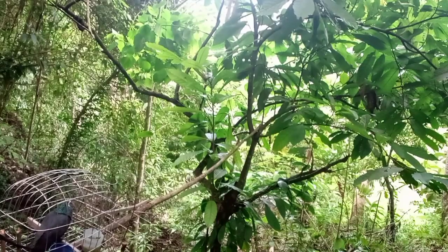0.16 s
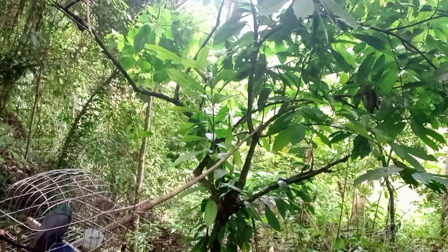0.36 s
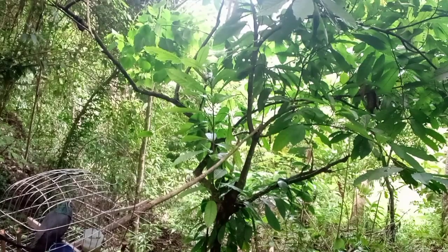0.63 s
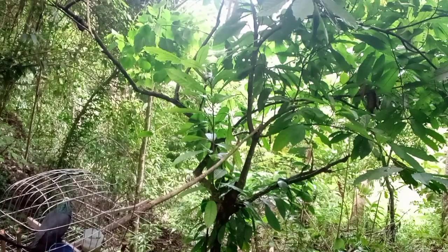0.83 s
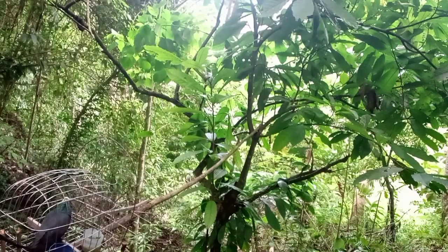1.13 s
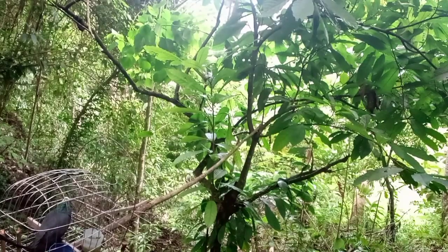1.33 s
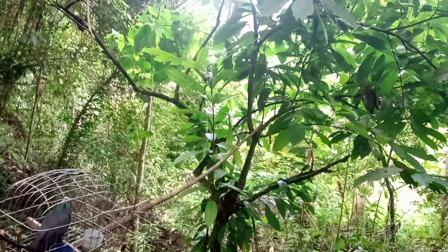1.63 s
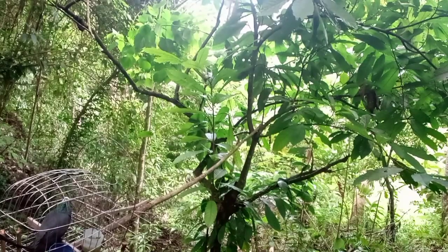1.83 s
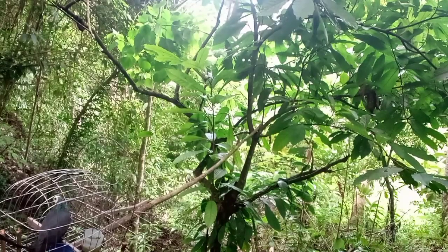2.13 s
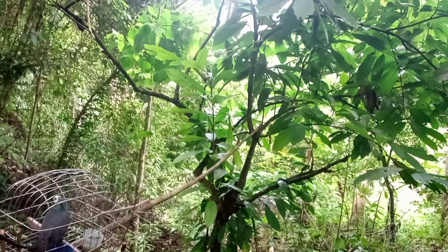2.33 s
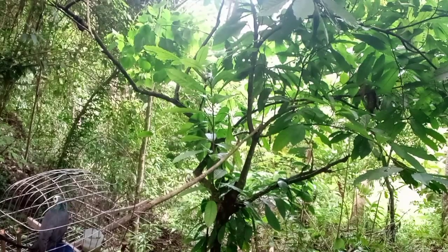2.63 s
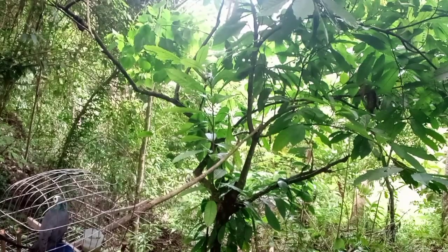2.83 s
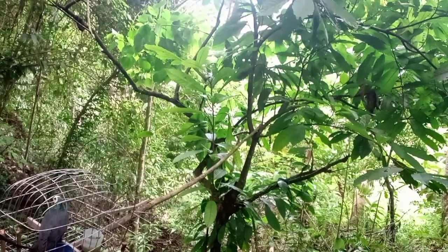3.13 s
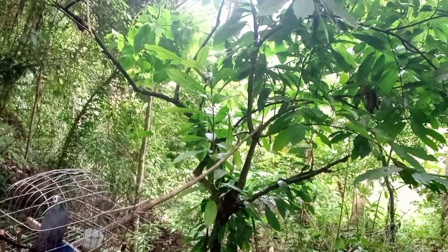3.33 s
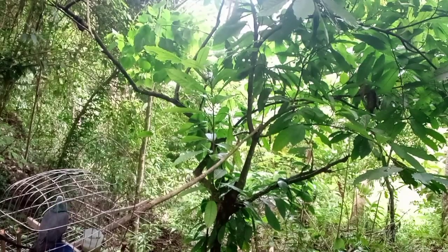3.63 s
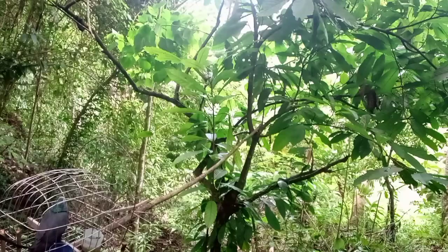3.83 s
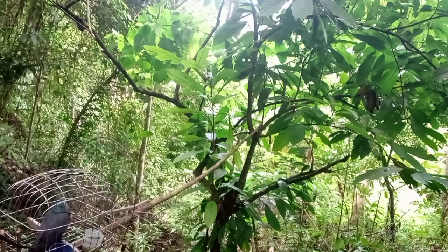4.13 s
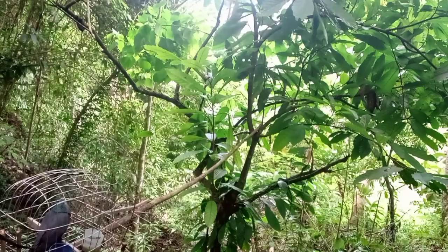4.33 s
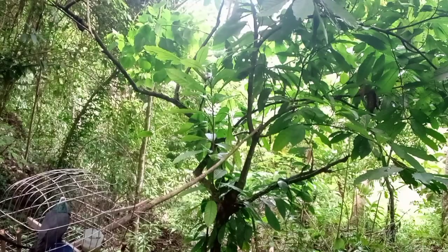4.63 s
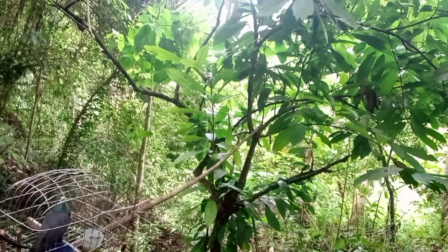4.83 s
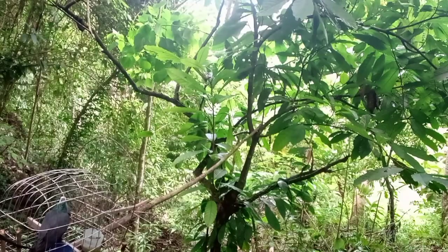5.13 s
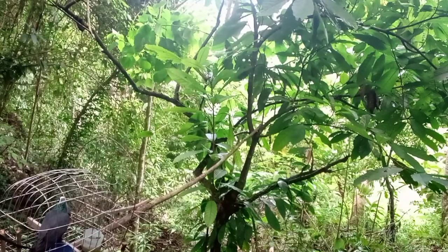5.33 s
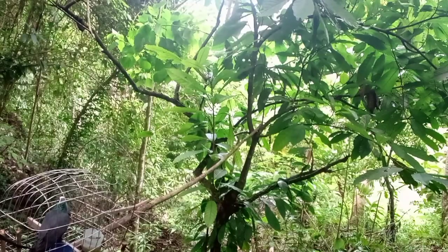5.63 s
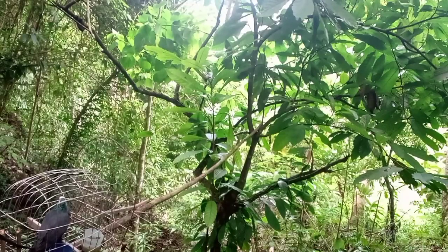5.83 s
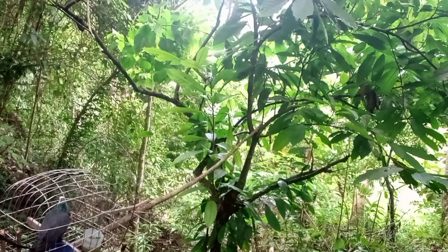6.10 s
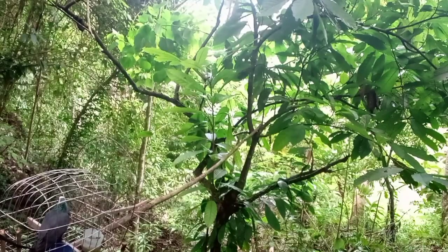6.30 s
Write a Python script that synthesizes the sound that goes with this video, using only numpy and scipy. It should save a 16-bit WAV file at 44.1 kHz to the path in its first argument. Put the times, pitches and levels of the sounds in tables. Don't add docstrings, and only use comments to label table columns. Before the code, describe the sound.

In a forest, a pigeon out of sight finishes a brief low coo right at the start. A near cricket then chirps rapidly in clear high pulses, with short gaps between bouts, over blurred cicadas and a very high rasping katydid. Twigs tick and one sharper click comes midway. Later the pigeon gives three closely spaced hollow coos, ringing softly among trunks. Faint farther hoots close it. One microphone, mono, with soft air rumble and slight hiss.

```python
import sys
import numpy as np
from scipy import signal
from scipy.fft import rfft, irfft
from scipy.io import wavfile
from scipy.ndimage import uniform_filter1d

SR = 44100
rng = np.random.default_rng(int(sys.argv[2]) if len(sys.argv) > 2 else 0)


def linear_from_db(decibels):
    return 10 ** (np.asarray(decibels, float) / 20)


def int16_out(signal):
    q = np.round(np.clip(np.atleast_2d(signal).T, -1, 1) * 32767)
    wavfile.write(sys.argv[1], SR, q.astype(np.int16))


N = 284886
TIME = np.arange(N) / SR
COARSE_STEP = 16
COARSE_N = -(-N // COARSE_STEP) + 2

# (time [s], voice pitch [Hz], voice level [dB], air-sac level [dB])
COOS = [
    [(0, 489, -52, -55), (.03, 481, -42, -65), (.055, 477, -38, -61), (.08, 491, -43, -63),
     (.098, 428, -44, -73)],
    [(3.783, 497, -44.5, -56.5), (3.798, 489.5, -40.5, -51.5), (3.82, 510, -50.5, -54),
     (3.834, 460, -41, -60)],
    [(4.024, 440, -47.5, -56), (4.042, 455.5, -35.5, -47), (4.078, 483, -46.5, -39.5),
     (4.1, 484, -41, -52.5), (4.15, 503, -43, -46), (4.178, 498.6, -35.5, -45.5), (4.205, 470, -46, -51.5),
     (4.225, 462, -41.5, -64), (4.25, 427, -40, -56.5)],
    [(4.281, 421, -46.5, -49), (4.315, 453.5, -35.5, -54), (4.358, 483, -41, -61), (4.385, 483, -40, -59),
     (4.415, 488, -43.5, -54), (4.452, 486, -51, -64.5), (4.49, 477, -39.5, -56.5), (4.525, 486, -42, -53),
     (4.549, 423, -45.5, -66.5)],
]


def columns(rows, t=TIME):
    s, *rest = np.transpose(rows)
    return [np.interp(t, s, column) for column in rest]


def rms_one(x):
    return x / np.sqrt(np.mean(x ** 2))


def coloured(spectrum):
    hz, db = np.transpose(spectrum)
    bins = np.arange(1, N // 2 + 2) * SR / N
    gain = linear_from_db(np.interp(np.log(bins), np.log(hz), db, -90, -90))
    return rms_one(irfft(rfft(rng.standard_normal(N)) * gain, N))


def coarse(hz):
    lowpass = signal.butter(2, hz, fs=SR / COARSE_STEP, output="sos")
    noise = rng.standard_normal(N // COARSE_STEP + SR // COARSE_STEP)
    return rms_one(signal.sosfilt(lowpass, noise)[-COARSE_N:])


def fine(x):
    return np.interp(np.arange(N) / COARSE_STEP, np.arange(len(x)), x)


def slow(hz):
    return fine(coarse(hz))


def turns(hz):
    return 2 * np.pi * np.cumsum(hz) / SR


def blur(hz, width_hz):
    phase = turns(hz)
    return slow(width_hz / 2) * np.cos(phase) + slow(width_hz / 2) * np.sin(phase)


def scatter(x, level_db, t60):
    age = TIME[:SR]
    build_up = np.minimum(age / 0.041, 1)
    wash = rng.standard_normal(SR) * linear_from_db(-60 * age / t60) * build_up
    return linear_from_db(level_db) * signal.fftconvolve(x, wash / np.sqrt(np.sum(wash ** 2)))[:N]


def moving_air():
    # (frequency [Hz], level [dB per Hz])
    air_spectrum = [(20, -32), (50, -9), (90, 0.5), (200, -4.5), (350, -8.5), (700, -13), (1500, -18),
                    (3000, -21), (3600, -25), (4750, -33.5), (7800, -27), (10000, -28.5), (13000, -25.5),
                    (16000, -24)]
    return linear_from_db(-62.5) * coloured(air_spectrum)


def choruses():
    # (centre [Hz], width [Hz], level [dB], throb rate [per s], throb depth [0-1], patchiness [dB])
    bands = [(7027, 204, -66, 42, 0.21, 0.7), (6850, 310, -73, 53, 0.1, 1.2), (5840, 420, -69, 39, 0.2, 1),
             (5570, 380, -74.5, 23, .1, 1.5), (6290, 220, -72, 35, 0, 2), (8070, 350, -88.5, 10, .4, 3.5),
             (7450, 300, -85.5, 9.4, .3, 5), (4020, 310, -86, 20, 0, 1)]
    steady = np.ones(N)
    out = np.zeros(N)
    for hz, width_hz, db, per_s, depth, patchy_db in bands:
        throb = 1 + depth * np.sin(turns(per_s * steady))
        out += linear_from_db(db + patchy_db * slow(3)) * throb * blur(hz * steady, width_hz)
    return out


def cicadas():
    # (start [s], length [s], level [dB], first resonance [Hz], last resonance [Hz])
    phrases = [(.2, .98, -74, 4000, 4270), (.18, 0.93, -73, 3860, 4000), (1.147, 1.54, -73, 3993, 4186),
               (1.7, 1.3, -72.5, 3907, 3878), (2.4, 1.13, -71.5, 4090, 4190),
               (2.75, 1.17, -76.5, 3930, 3900), (3.448, 1.41, -80.5, 4154, 4120),
               (3.7, 1.22, -77, 3890, 3880), (4.744, 1.62, -72, 4100, 4236), (4.798, 1.38, -72, 3900, 3930),
               (6.2, .6, -79, 3870, 3900)]
    clicks_per_s = (96.9, 97.4)
    line_width_hz, resonance_width_hz = 24, 207
    swell_shape, cut_off_s = 0.51, 0.051
    centre_hz = 4050
    t = np.arange(COARSE_N) * COARSE_STEP / SR
    out = 0
    for voice, per_s in enumerate(clicks_per_s):
        flutter = linear_from_db(-5 + 0.87 * coarse(6.8))
        for line_hz in np.arange(37, 47) * per_s:
            heard = 0
            for start, length, db, first_hz, last_hz in phrases[voice::2]:
                along = np.clip((t - start) / length, 0, 1)
                swell = np.abs(np.sin(np.pi * along ** 1.19)) ** swell_shape
                swell = swell * np.clip((1 - along) * length / cut_off_s, 0, 1) * (along > 0)
                resonance_hz = first_hz + (last_hz - first_hz) * along
                picked = np.exp(-((line_hz - resonance_hz) / resonance_width_hz) ** 2)
                heard = heard + linear_from_db(db) * swell * picked
            line = coarse(line_width_hz) + 1j * coarse(line_width_hz) + .5 * coarse(60)
            out += flutter * heard * line * np.exp(2j * np.pi * (line_hz - centre_hz) * t)
    return np.real(fine(out) * np.exp(2j * np.pi * centre_hz * TIME))


def katydid():
    # (time [s], lead [strokes])
    lead = [(0, -.43), (.95, .22), (1.2, .11), (1.5, .11), (2.55, -.36), (3.0, -.3), (3.6, -.29),
            (4.5, -.05), (5.1, .2), (5.3, .09), (6.46, .19)]
    # (frequency [Hz], level [dB per Hz])
    rasp_spectrum = [(10400, -43), (11650, -17.5), (13350, -18), (14050, -7.5), (14620, 0.5), (14950, -2),
                     (15320, 0.5), (16400, -5.5)]
    count = 55 * TIME + columns(lead)[0] + 1.5
    to_peak = count % 1 - .53
    shape = np.exp(np.where(to_peak < 0, to_peak / .095, -to_peak / 0.05))
    strength = linear_from_db(2.1 * rng.standard_normal(400))[count.astype(int)]
    second = np.exp(-((TIME - 4.1) / .07) ** 4)
    scrape = shape * strength + 0.19 + .15 * second
    return linear_from_db(-56.5 + .3 * second) * scrape * coloured(rasp_spectrum)


def twigs():
    # (time [s], peak level [dB], centre [Hz], t60 [s])
    ticks = [(.187, -56.5, 493, .12), (.219, -55, 467, 0.073), (.4905, -59, 1200, .06),
             (.89, -62, 3150, .22), (1.3785, -60, 2900, .025), (1.54, -63, 2450, .12),
             (1.7035, -58, 2950, .035), (2.455, -61, 2750, .05), (2.9485, -58, 2400, 0.039),
             (3.081, -54.5, 1600, 0.13), (3.089, -60, 2540, .05), (4.64, -52, 500, 0.083),
             (5.845, -64, 2950, .22), (5.9175, -55.5, 3200, .05), (3.081, -56, 754, .07)]
    half_width = 1.45
    out = np.zeros(N + SR)
    age = np.arange(6000) / SR
    for s, db, hz, t60 in ticks:
        band = signal.butter(2, [hz / half_width, hz * half_width], "band", fs=SR, output="sos")
        puff = rng.standard_normal(len(age)) * linear_from_db(-60 * age / t60)
        puff = signal.sosfilt(np.vstack([band, band]), puff)
        at = round(s * SR)
        out[at:at + len(age)] += linear_from_db(db) * puff / abs(puff).max()
    return out[:N]


def strokes(rows):
    # (time after onset [s], pitch ratio [1], level [dB])
    one_stroke = [(-.0022, .925, -45), (-.0011, .94, -10), (0, .968, -3.5), (.005, 1.003, -.5),
                  (.014, .998, -.7), (.0255, .943, -5), (.0285, .914, -22), (.031, .898, -9.5),
                  (.04, .83, -45)]
    spread_db, tail_db, tail_spread_db = .3, -3, 2
    tail_from_s, tail_full_s = 0.021, 0.04
    lead_in, length = 100, 1800
    out = np.zeros(N + SR)
    age = np.arange(-lead_in, length - lead_in) / SR
    ratio, db = columns(one_stroke, age)
    share = np.clip((age - tail_from_s) / (tail_full_s - tail_from_s), 0, 1)
    for (s, level_db, top_hz), (start, strong, tail) in zip(rows, rng.standard_normal((400, 3))):
        at = round(s * SR)
        tail_gain_db = share * (tail_db + tail_spread_db * tail)
        gain = linear_from_db(level_db + spread_db * strong + db + tail_gain_db)
        out[at:at + length] += gain * np.sin(turns(ratio * top_hz) + 2 * np.pi * start)
    return out[lead_in:N + lead_in]


def chirps():
    # (time [s], stroke number [1], top pitch [Hz])
    bouts = [
        [(.2598, 0, 6190), (.472, 2, 6225), (.6805, 4, 6245), (.9971, 7, 6250), (1.3067, 10, 6250),
         (1.4117, 11, 6242)],
        [(1.6143, 0, 6240), (2.2578, 6, 6236), (2.7888, 11, 6233), (3.4293, 17, 6236), (3.9611, 22, 6226)],
        [(4.2088, 0, 6220), (4.848, 6, 6232), (5.063, 8, 6237), (5.914, 16, 6233), (6.125, 18, 6235),
         (6.4444, 21, 6238)],
    ]
    rows = []
    for bout in bouts:
        s, number, hz = np.transpose(bout)
        for k in np.arange(number[-1] + 1):
            rows.append((np.interp(k, number, s), -38.5, np.interp(k, number, hz)))
    return rows


def crickets():
    # (first stroke [s], period [s], top pitch [Hz], level [dB])
    far_singers = [(.03, .113, 6100, -65.5), (.07, 0.078, 5900, -66), (0.012, 0.1, 6290, -65.5),
                   (.05, 0.09, 5600, -66)]
    wing = signal.butter(6, 4950, "high", fs=SR, output="sos")
    leaves = linear_from_db(0.23 + 0.82 * slow(250))
    near = signal.sosfilt(wing, strokes(chirps()) * leaves + 1e-18)
    far_rows = [(s, db, top_hz) for first, period, top_hz, db in far_singers
                for s in np.arange(first, N / SR, period)]
    return near + scatter(near, -23.5, 0.23) + scatter(strokes(far_rows), -1.5, 0.34)


def notes():
    # (time [s], pitch [Hz], voice level [dB], air-sac level [dB])
    scoop, fall = (-.014, -38, -15, 1), (.016, -72, -17, -8)
    return [[np.add(note[0], scoop), *note, np.add(note[-1], fall)] for note in COOS]


def gate(sung, fade_s):
    on = sum((TIME >= note[0][0]) & (TIME < note[-1][0]) for note in sung) > 0
    return uniform_filter1d(on * 1., round(fade_s * SR), mode="nearest")


def far_birds():
    # (time [s], pitch [Hz], level [dB])
    far_notes = [
        [(4.278, 8050, -84), (4.295, 8000, -74), (4.305, 7950, -84), (4.318, 7850, -78.5), (4.33, 7800, -86)],
        [(6.109, 620, -61), (6.115, 660, -48.5), (6.127, 722, -68), (6.142, 718, -57), (6.155, 640, -70)],
        [(6.4, 510, -60), (6.415, 512, -61.5), (6.44, 540.4, -45.5), (6.45, 615, -50), (6.47, 680, -45)],
    ]
    hz, db = columns(sum(far_notes, []))
    far = linear_from_db(db - 1.0) * np.sin(turns(hz)) * gate(far_notes, .004)
    return far + scatter(far, -6.5, .4)


def pigeons():
    sung = notes()
    hz, voice_db, sac_db = columns(sorted(sum(sung, []), key=lambda row: row[0]))
    phase = turns(hz * (1 + 0.003 * slow(40)))
    octave_db = -76 + 0.76 * (sac_db + 53)
    octave = linear_from_db(octave_db) * np.exp(-((hz - 488) / 49) ** 2)
    voice = linear_from_db(voice_db + 0.57 * slow(120)) * np.sin(phase) + octave * np.sin(2 * phase)

    note_sac_hz = (638, 569, 570, 582)
    sac_rows = [(row[0], note_hz) for note, note_hz in zip(COOS, note_sac_hz) for row in (note[0], note[-1])]
    sac_hz = columns(sac_rows)[0] + 2.5 * (sac_db + 49.5)
    sac = linear_from_db(4.2 * slow(39) - 1.5) * np.sin(turns(sac_hz * (1 + 0.0179 * slow(50.1))))

    breath_db = -12.5 + sac_db * 0.7 - 23.5
    breath = linear_from_db(breath_db) * blur(640 * np.ones(N), 164)
    near = (voice + linear_from_db(sac_db) * sac + breath) * gate(sung, 0.0066)
    return np.sqrt(2) * (near + far_birds())


def glade(x):
    # (ringing pitch [Hz], level [dB], t60 [s])
    ringing = [(485, -21, 1.2), (485, -7.5, .36)]
    out = x + scatter(x, -13, 0.4)
    for hz, db, t60 in ringing:
        r = linear_from_db(-60 / (t60 * SR))
        poles = [1, -2 * r * np.cos(2 * np.pi * hz / SR), r * r]
        out += linear_from_db(db) * signal.lfilter([1 - r, 0, r - 1], poles, x + 1e-18)
    return out


def scene():
    insects = choruses() + cicadas() + katydid() + crickets()
    return (moving_air() + insects + twigs() + glade(pigeons()))[None]


def roll_off(x):
    return signal.sosfilt(signal.butter(12, 17000, fs=SR, output="sos"), x)


def record(dry):
    top = signal.ellip(16, .05, 70, 15750, fs=SR, output="sos")
    return roll_off(signal.sosfilt(top, dry))


dry = scene()
out = record(dry)
int16_out(out)
```